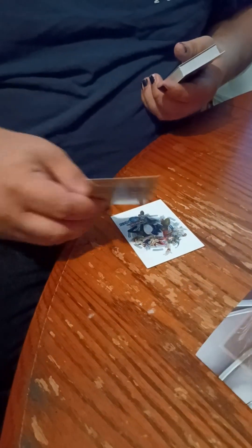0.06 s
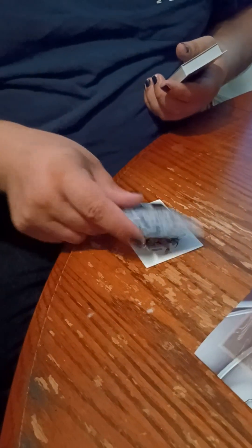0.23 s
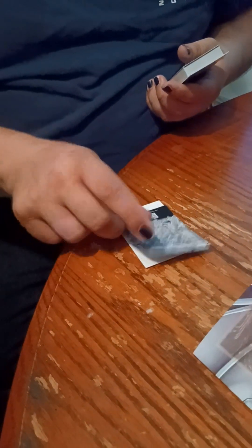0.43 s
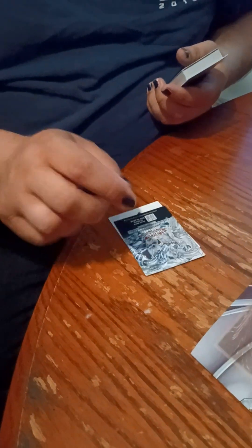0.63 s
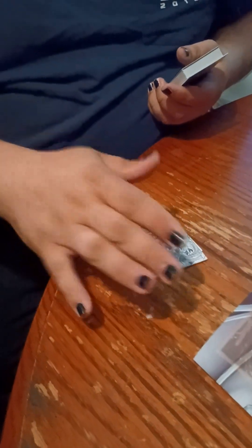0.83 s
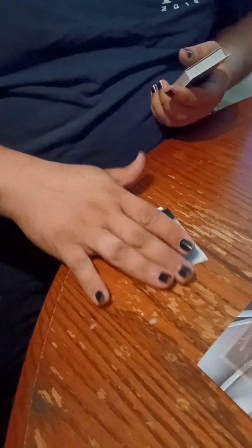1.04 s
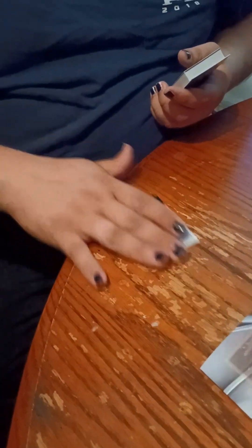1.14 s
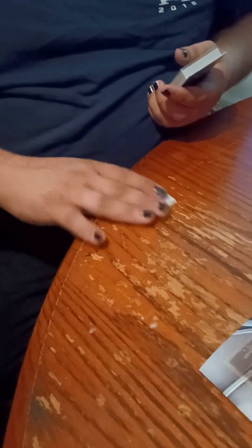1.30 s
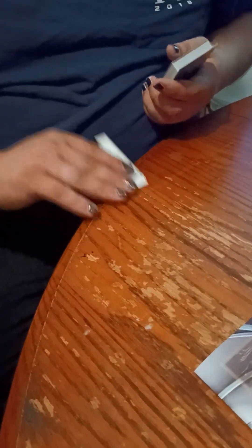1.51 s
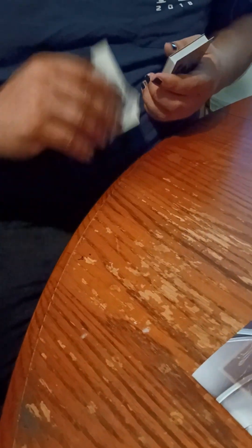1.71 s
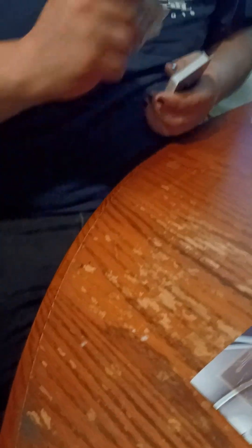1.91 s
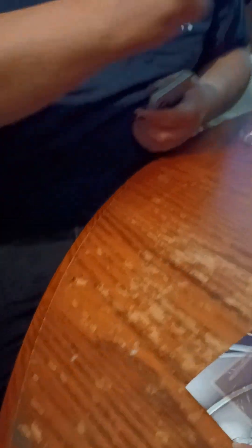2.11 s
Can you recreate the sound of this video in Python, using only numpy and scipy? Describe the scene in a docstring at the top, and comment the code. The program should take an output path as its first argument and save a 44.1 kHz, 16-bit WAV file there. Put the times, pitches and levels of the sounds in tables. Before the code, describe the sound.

Sharp clicks of a playing card laid on wood, followed by a quiet sliding rustle.

```python
"""A playing card snaps down on a wooden table: its edge strikes, the card slaps flat, then a
corner scrapes off the thumb and cracks onto the wood. Each hit makes the table top ring.
The hand slides the hissing cards over the table's edge and lifts them away, with a soft
brush of sleeve. Behind it all, ventilation hums low and wavers in a small room."""
import sys
import numpy as np
from scipy import signal
from scipy.fft import rfft, irfft
from scipy.io import wavfile
from scipy.ndimage import uniform_filter1d

SR = 44100
rng = np.random.default_rng(int(sys.argv[2]) if len(sys.argv) > 2 else 0)


def output_pcm(signal):
    """Save a mono or channel-first signal as 16-bit PCM at the path in sys.argv[1].

    Samples are clipped to [-1, 1] before scaling.
    """
    pcm = np.clip(np.atleast_2d(signal).T, -1, 1) * 32767
    wavfile.write(sys.argv[1], SR, np.round(pcm).astype(np.int16))


N = 94815


def amp(db):
    """Turns decibels into a gain to multiply by."""
    return 10 ** (np.asarray(db) / 20)


def unit(x):
    """Scales a sound to an average strength (rms) of 1."""
    return x / np.sqrt(np.mean(x ** 2) + 1e-20)


def read(points, hz):
    """Reads between a table's rows along a musical (log) pitch scale."""
    pitch_hz, value = np.transpose(points)
    return np.interp(np.log(hz + 1), np.log(pitch_hz + 1), value)


def bins(size):
    """The frequencies in the spectrum of `size` samples."""
    return np.fft.rfftfreq(size, 1 / SR)


def sides(db):
    """Left and right gains, with the left louder by `db`."""
    return amp(np.array([[.5], [-.5]]) * db)


def coloured(x, gain):
    """Filters a whole track and scales it to strength 1."""
    return unit(irfft(rfft(x) * gain, N))


def shortest_ring(db, size=4096):
    """The shortest ring that has this spectrum."""
    log_gain = np.log(amp(np.r_[db, db[-2:0:-1]]))
    spectrum = np.exp(np.conj(signal.hilbert(log_gain)))
    return np.fft.ifft(spectrum).real[:size // 2]


def level(points):
    """Gain over time from rows of time_s, level_db."""
    return amp(np.interp(np.arange(N) / SR, *np.transpose(points)))


def drift(speed_hz=8.94):
    """A slow random wander of strength 1."""
    return coloured(rng.standard_normal(N), np.exp(-(bins(N) / speed_hz) ** 2))


def wavering_tones(table, waver_db):
    """Pure tones that wander in pitch and loudness."""
    out = 0
    for pitch_hz, db, waver_hz in table:
        turns = np.cumsum(pitch_hz + waver_hz * drift()) / SR
        tone = np.sin(2 * np.pi * turns) * amp(waver_db * drift())
        out = out + amp(db) * unit(tone)
    return out


def stroke(start_s, rise_s, hold_s, release_s, db):
    """The smooth rise, hold and fade of one hand movement."""
    t = np.arange(N) / SR - start_s
    ramp = np.minimum(t / rise_s, (rise_s + hold_s + release_s - t) / release_s)
    return amp(db) * np.sin(np.pi / 2 * np.clip(ramp, 0, 1)) ** 2


# The tone of the moving air: pitch_hz, gain_db
AIR_COLOUR = [(20, -56), (45, -39), (85, 2), (160, 0), (190, -4), (240, 6.5), (330, -3), (420, 0.5),
              (620, -6), (900, -4), (1500, -13), (2000, -13), (2800, -14.5), (4000, -25.5), (6600, -29),
              (8000, -38.5), (12500, -41), (16000, -45)]
# How alike its two sides are (1 the same, -1 or less opposite): pitch_hz, likeness
AIR_LIKENESS = [(60, 0.71), (130, 1), (290, 1), (640, 0.93), (1400, -1.81), (3100, 0.31), (15000, -0.58)]
# Which side the air leans to: pitch_hz, left_over_right_db
AIR_BALANCE = [(100, -7.5), (700, 2.5), (1300, -1), (2400, -7), (4400, -3), (8000, 1.5), (15000, -8)]
def air_rush(level_db=-51):
    """Moving air makes a steady, deep rush of noise."""
    hz = bins(N)
    left, other = rfft(rng.standard_normal((2, N)))
    likeness = np.clip(read(AIR_LIKENESS, hz), -1, 1)
    right = likeness * left + np.sqrt(1 - likeness ** 2) * other
    spectrum = np.array([left, right]) * amp(read(AIR_COLOUR, hz)) * sides(read(AIR_BALANCE, hz))
    return amp(level_db) * unit(irfft(spectrum, N))


# The drone's low tones and its upper tone: pitch_hz, gain_db, waver_size_hz
LOW_DRONE = [(110.4, 0, 2.96), (122.2, -7.5, 1.74)]
UPPER_DRONE = [(210.6, 0, 2.89)]
# How the low tones swell, then the upper tone early and late: time_s, level_db
LOW_SWELLS = [(0.0, -48.5), (0.03, -62), (0.19, -48), (0.21, -54), (0.26, -48.5), (0.51, -45.5),
              (0.54, -61), (0.57, -49), (0.63, -56), (0.65, -49.5), (0.93, -46.5), (0.95, -64),
              (0.98, -46.5), (1.06, -55.5), (1.1, -45), (1.14, -57), (1.18, -44), (1.22, -46.5),
              (1.25, -65), (1.29, -47), (1.36, -56), (1.39, -43), (1.54, -61), (1.57, -47), (1.61, -44.5),
              (1.65, -61), (1.7, -52), (1.74, -58), (1.81, -42.5), (1.96, -65), (1.99, -45), (2.15, -52.5)]
UPPER_OPENING = [(0, -55), (.4, -60)]
UPPER_SWELLS = [(0.55, -69), (0.598, -51), (0.906, -57), (0.982, -45.5), (1.03, -58), (1.334, -52.5),
                (1.36, -61), (1.422, -48.5), (1.508, -59), (1.624, -47.5), (1.77, -64), (1.792, -54),
                (1.894, -62), (2.15, -51.5)]
def drone(low_gain_db=-0.5, waver_db=0.76):
    """The ventilation's strong, low drone swells and sinks."""
    low = amp(low_gain_db) * wavering_tones(LOW_DRONE, waver_db) * level(LOW_SWELLS)
    upper = wavering_tones(UPPER_DRONE, waver_db) * level(UPPER_OPENING + UPPER_SWELLS)
    return low + upper


# The ventilation's faint tones: pitch_hz, level_db, waver_size_hz
HUM_TONES = [(60.2, -77, 0.41), (416, -61.5, 7.67), (796, -66, 1.97), (870, -75.5, 2.58),
             (866, -63.5, 5.05)]
def ventilation(right_late_s=0.00034):
    """Air, drone and hum together, reaching the right side a moment after the left."""
    sound = air_rush() + drone() + wavering_tones(HUM_TONES, waver_db=3.5)
    delay = np.exp(-2j * np.pi * bins(N) * np.array([[0], [right_late_s]]))
    return irfft(rfft(sound) * delay, N)


# How long the room's echo takes to fade by 60 dB: pitch_hz, fade_s
ROOM_FADE = [(150, 0.67), (500, 0.15), (1500, 0.17), (3500, 0.16), (8000, .23), (15000, 0.18)]
# The tone of the echo: pitch_hz, gain_db
ROOM_COLOUR = [(150, 1.5), (500, 6.5), (1500, 3), (3500, -6), (8000, -3), (15000, 0.5)]
def room_echo(sound, onset_s=0.0013, mono_below_hz=540):
    """A small room throws back a crowd of reflections; each pitch fades at its own speed."""
    reflections = rng.standard_normal((2, SR // 2)) * (rng.random((2, SR // 2)) < .15)
    hz, t, (left, other) = signal.stft(reflections, SR, nperseg=256)
    likeness = 1 / (1 + (hz[:, None] / mono_below_hz) ** 4)  # bass reaches both sides alike
    right = likeness * left + np.sqrt(1 - likeness ** 2) * other
    fade = amp(-60 * t / read(ROOM_FADE, hz)[:, None])
    tail = signal.istft(np.array([left, right]) * fade, SR, nperseg=256)[1]
    onset = np.minimum(np.arange(tail.shape[1]) / SR / onset_s, 1) ** 2
    spectrum = rfft(tail * onset, SR)
    flat = spectrum / np.sqrt(uniform_filter1d(abs(spectrum) ** 2, size=400, axis=1))
    echo = irfft(flat * amp(read(ROOM_COLOUR, bins(SR))), SR)[:, :SR // 2]
    return signal.fftconvolve(sound, echo, axes=1)[:, :N]


# The sleeve's movements: start_s, rise_s, hold_s, release_s, level_db
SLEEVE_STROKES = [(1.446, 0.028, .02, 0.056, -56), (2.064, 0.032, 0.041, .04, -47)]
# The tone of the cloth: pitch_hz, gain_db
SLEEVE_COLOUR = [(60, -16.5), (150, 6.5), (300, -1), (500, 0), (1200, -33), (4000, -34)]
def sleeve():
    """Cloth gives a dull brush as the arm moves."""
    noise = rng.standard_normal((2, N)) + rng.standard_normal(N)  # partly shared by both sides
    cloth = coloured(noise, amp(read(SLEEVE_COLOUR, bins(N))))
    return cloth * sum(stroke(*row) for row in SLEEVE_STROKES)


def friction(slips_per_s=3500, slip_share=0.38, spread_db=3):
    """Sliding surfaces make tiny slips of uneven size in a smooth hiss."""
    slips = rng.random(N) < slips_per_s / SR
    sizes = amp(spread_db * np.minimum(rng.exponential(1, N), 4))
    crackle = unit(slips * sizes * rng.standard_normal((2, N)))
    hiss = rng.standard_normal((2, N))
    return np.sqrt(slip_share) * crackle + np.sqrt(1 - slip_share) * hiss


# Each slide of a card: start_s, rise_s, hold_s, release_s, level_db, rasp_boost_db
RUB_STROKES = [(-0.03, .02, .02, 0.28, -82, -2), (0.366, 0.068, 0.0046, 0.0092, -58.5, 8),
               (0.43, 0.0085, 0.0023, 0.01, -44, 4), (0.685, .005, 0.0026, 0.022, -57.5, -10),
               (0.994, 0.062, 0.035, 0.043, -68.5, 6.5), (1.069, .04, 0.024, .05, -62, 1.5),
               (1.112, 0.096, 0.091, 0.073, -55.5, -1), (1.306, 0.069, 0.11, 0.071, -64, 3),
               (1.474, 0.039, .005, 0.077, -57, -0.5), (1.735, 0.062, 0.022, 0.044, -58, 0),
               (1.834, 0.032, 0.18, 0.056, -72.5, 6), (2.031, .085, .04, .05, -62, 6)]
# The tone of the rubbing: pitch_hz, gain_db
RUB_COLOUR = [(300, -1), (1200, -2.5), (2500, 0.5), (4000, 1.5), (6600, -0.5), (8000, -6.5), (10000, -4),
              (13000, 2), (15500, -8.5)]
# Which side it leans to: pitch_hz, left_over_right_db
RUB_BALANCE = [(500, 14), (2400, -15.5), (4400, -0.5), (8000, 4), (15000, -11)]
def card_rubs(rasp_below_hz=7400):
    """The card hisses over wood or skin, with more or less rasp according to the pressure."""
    hz = bins(N)
    hiss = coloured(friction(), amp(read(RUB_COLOUR, hz)) * sides(read(RUB_BALANCE, hz)))
    rasp = irfft(rfft(hiss) / (1 + (hz / rasp_below_hz) ** 8), N)
    return sum(stroke(*row) * (hiss + (amp(rasp_db) - 1) * rasp) for *row, rasp_db in RUB_STROKES)


# Each pull over the table's edge: start_s, rise_s, hold_s, release_s, level_db
DRAG_STROKES = [(1.492, 0.023, 0.0062, 0.016, -52), (1.534, 0.018, .005, .025, -58.5)]
# Where the scraped cards ring: pitch_hz, width_hz, gain_db
DRAG_RINGS = [(2470, 440, 1), (4050, 500, 0), (5300, 920, 1), (6450, 400, 0.5)]
def edge_drag():
    """The table's edge scrapes the overhanging cards, which ring."""
    hz = bins(N)
    power = sum(amp(db) ** 2 / (1 + (2 * (hz - pitch_hz) / width_hz) ** 2) ** 2
                for pitch_hz, width_hz, db in DRAG_RINGS)
    return sum(stroke(*row) for row in DRAG_STROKES) * coloured(friction(), np.sqrt(power))


# The table top's own notes: pitch_hz, relative_db, fade_s (time to fall 60 dB)
TABLE_NOTES = [(250, -1, 0.19), (338, 6.5, 0.14), (454, -9, 0.15), (544.4, -2, 0.27), (721, -2.5, 0.24),
               (831, 0, 0.2), (1100, -35, .11), (1570, -13, .09)]
def table_ring(hits, gain_db=-57.5):
    """The wooden top rings on after each hit."""
    t = np.arange(SR // 2) / SR
    ring = sum(amp(db - 60 * t / fade_s) * np.sin(2 * np.pi * (hz * t + rng.random((2, 1))))
               for hz, db, fade_s in TABLE_NOTES)
    return amp(gain_db) * signal.fftconvolve(hits, ring, axes=1)[:, :N]


# The tone all snaps start from: pitch_hz, gain_db
SNAP_COLOUR = [(60, -29), (150, -7), (350, -3), (700, -5), (1050, -3), (1450, -4.5), (2000, -2), (3000, -5),
               (4200, -4.5), (5500, -14.5), (7300, -18), (9000, -27.5), (12500, -21.5), (16000, -32)]
def snap_tone(hz, thud_db, knock_db, edge_db, ring_hz, ring_db):
    """One hit's tone in dB: a low thud, a wooden knock, a bright edge and the card's ring."""
    thud_below_hz, knock_hz, edge_above_hz = 715, 1036, 4500
    knock_octaves, ring_octaves = .24, .28
    thud = thud_db / (1 + (hz / thud_below_hz) ** 2)
    knock = knock_db * np.exp(-(np.log2(hz / knock_hz) / knock_octaves) ** 2)
    edge = edge_db / (1 + (edge_above_hz / hz) ** 6)
    ring = ring_db * np.exp(-(np.log2(hz / ring_hz) / ring_octaves) ** 2)
    return read(SNAP_COLOUR, hz) + thud + knock + edge + ring


# Which side the snaps lean to: pitch_hz, left_over_right_db
SNAP_BALANCE = [(200, 4.5), (500, 3), (1100, 2.5), (2600, -4.5), (5500, 5.5), (9000, 3), (14000, -1)]
def snap(tone, clatter_s, pan_db, size=4096):
    """One sharp contact, then the light card clatters in the treble for a few milliseconds."""
    contact_below_hz, clatter_above_hz, clatter_db = 5400, 2750, 2.5
    travel_at_1khz_s, left_late_s = 0.001168, .0001
    hz, t = bins(size) + 1, np.arange(size) / SR
    contact = 1 / (1 + 1j * hz / contact_below_hz) ** 2
    clatter = rng.standard_normal((2, size)) * np.exp(-t / clatter_s) * (1 - np.exp(-2 * t / clatter_s))
    clatter /= np.linalg.norm(clatter, axis=1, keepdims=True)
    treble = amp(clatter_db) / (1 + clatter_above_hz / (1j * hz))
    force = contact + treble * rfft(clatter)
    # Even out chance peaks so the clatter has no pitch of its own.
    power = uniform_filter1d(abs(force) ** 2, size=15, axis=1)
    ripple_db = 10 * np.log10(power / (1 + abs(treble) ** 2))
    body = rfft(np.array([shortest_ring(snap_tone(hz, *tone) - side) for side in ripple_db]), size)
    # In the wood, the treble travels ahead of the bass.
    travel_turns = 2 * travel_at_1khz_s * np.sqrt(1000 * hz)
    delay = np.exp(-2j * np.pi * (travel_turns + np.array([[left_late_s], [0]]) * hz))
    balance = sides(pan_db + read(SNAP_BALANCE, hz))
    return irfft(force * body * delay * balance)[:, :size // 2]


# Each hit of the card: start_s, relative_db, thud_db, knock_db, edge_db, ring_hz, ring_db,
# clatter_s, left_over_right_db
CARD_HITS = [(0.1002, -33.5, -1, 18.5, -4.5, 3060, 7.5, 0.0011, -5),
             (0.2210, -1, -1.5, -6, 2.5, 2680, 7, 0.0033, -4.5),
             (0.2598, -18, 6.5, 7.5, 2, 2680, 5.5, 0.0036, -7.5),
             (0.3002, -5.5, -0.5, 6.5, -4.5, 2300, 5.5, 0.0022, -4.5),
             (0.4405, -19, 5.5, 3, 13, 3020, 10, 0.0011, -5),
             (0.4642, -2.5, 2, 2, -6.5, 3340, 6, 0.0016, -5.5),
             (1.1186, -36.5, 16, 9, 8, 4200, -3.5, 0.0015, 0), (1.519, -34, -6, 2, 5, 4200, 6.5, 0.0026, 0),
             (1.7088, -39, 14.5, 4, 2, 2000, 2, 0.0018, 2.5)]
def card_snaps(gain_db=12.5):
    """The card strikes the wood again and again, setting the table top ringing."""
    hits = np.zeros((2, N))
    for start_s, db, *tone, clatter_s, pan_db in CARD_HITS:
        sound = amp(gain_db + db) * snap(tone, clatter_s, pan_db)
        start = round(start_s * SR)
        hits[:, start:start + sound.shape[1]] += sound[:, :N - start]
    return hits + table_ring(hits)


def scene(echo_db=-5.5, crossover_db=-3):
    """The cards and their echo, with the sleeve and the ventilation behind them."""
    cards = card_snaps() + card_rubs() + edge_drag()
    same_side = room_echo(cards)
    opposite_side = amp(crossover_db) * room_echo(cards[::-1])
    return cards + amp(echo_db) * (same_side + opposite_side) + sleeve() + ventilation()


def record(dry, cutoff_hz=15900):
    """Takes away the very highest treble."""
    lowpass = signal.firwin(401, cutoff_hz, window=("kaiser", 8), fs=SR)
    return signal.oaconvolve(dry, lowpass[None], "same")


dry = scene()
out = record(dry)
output_pcm(out)
```